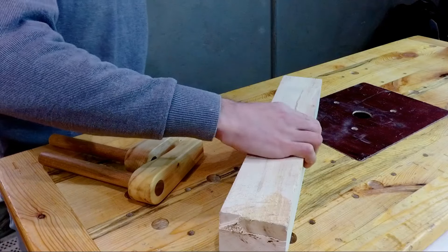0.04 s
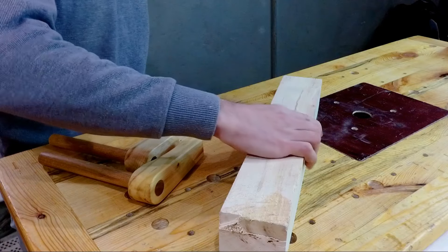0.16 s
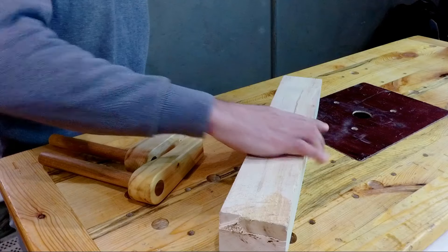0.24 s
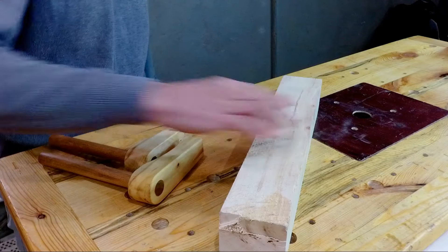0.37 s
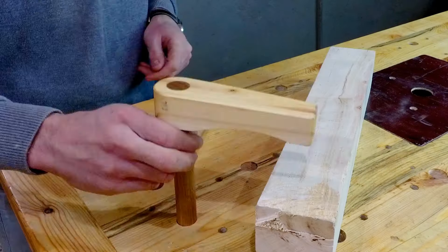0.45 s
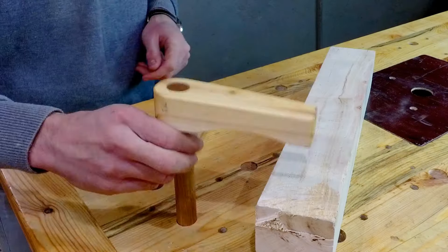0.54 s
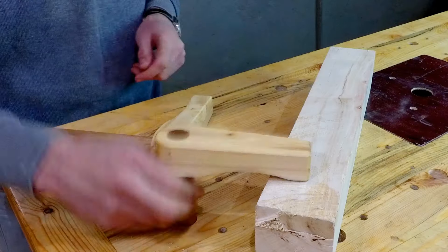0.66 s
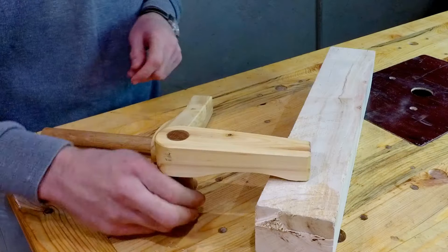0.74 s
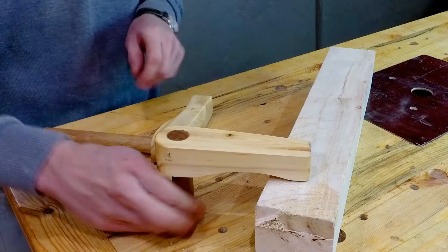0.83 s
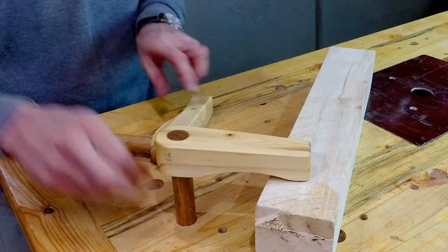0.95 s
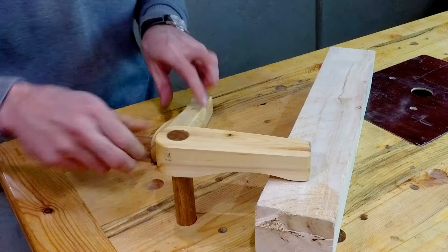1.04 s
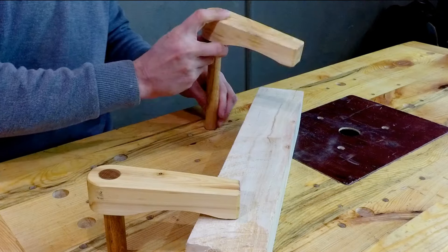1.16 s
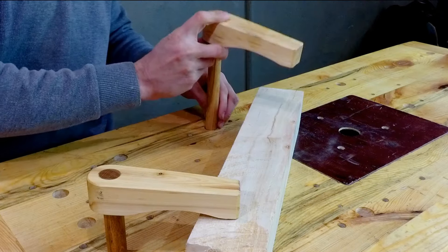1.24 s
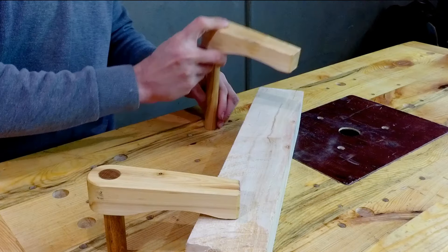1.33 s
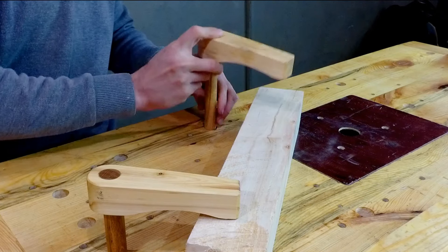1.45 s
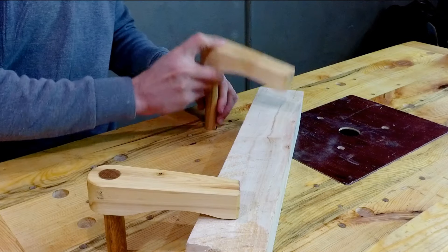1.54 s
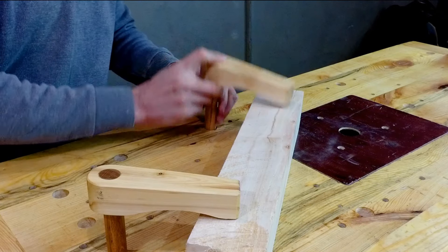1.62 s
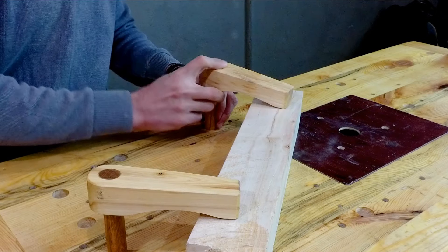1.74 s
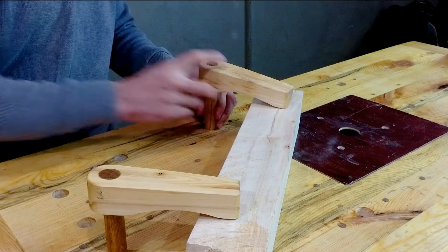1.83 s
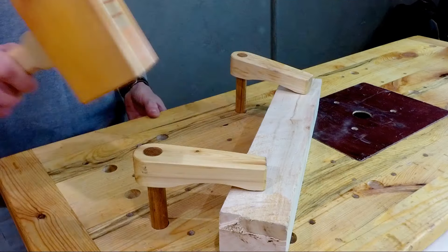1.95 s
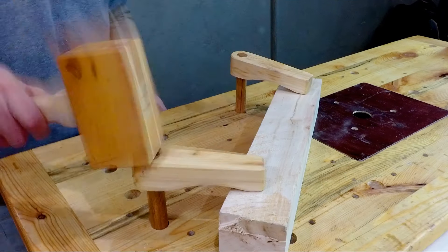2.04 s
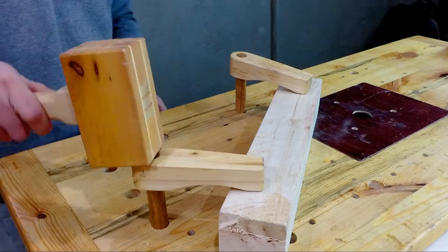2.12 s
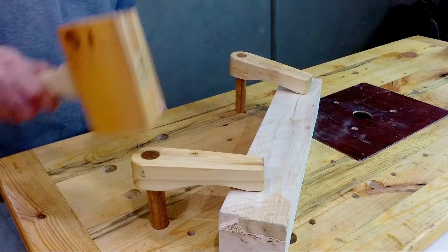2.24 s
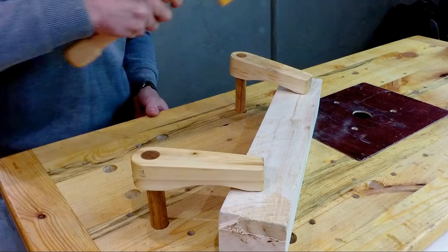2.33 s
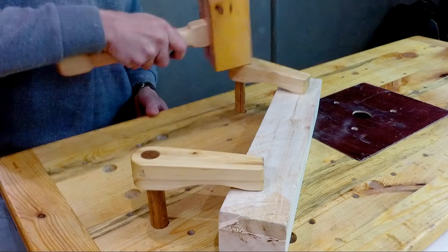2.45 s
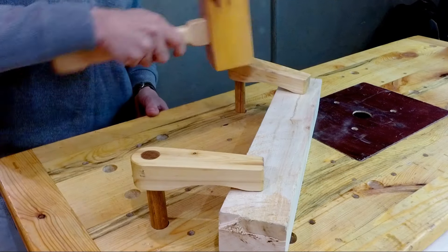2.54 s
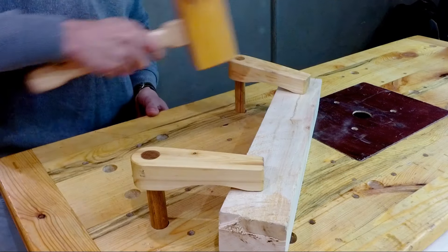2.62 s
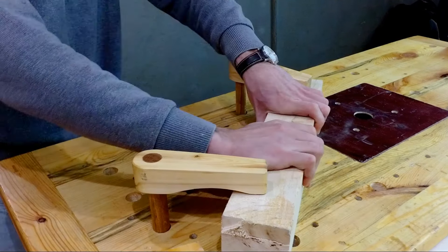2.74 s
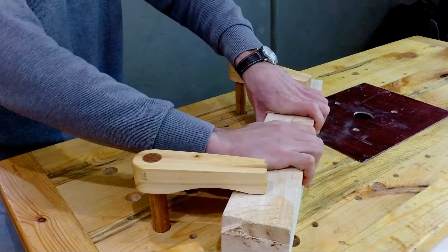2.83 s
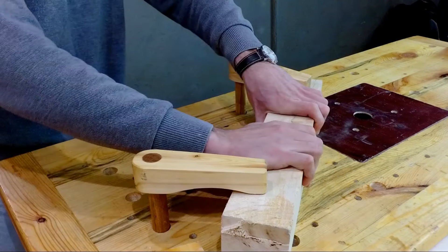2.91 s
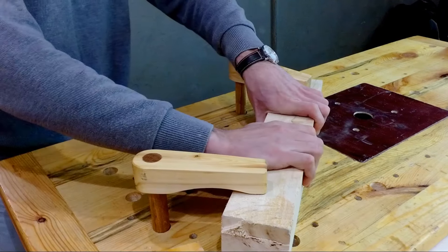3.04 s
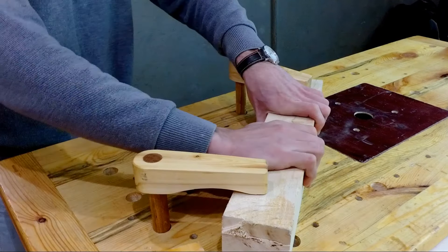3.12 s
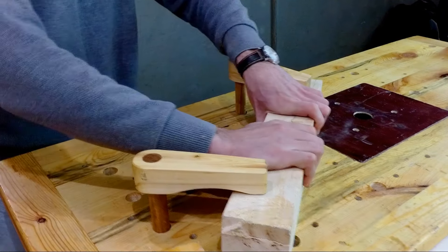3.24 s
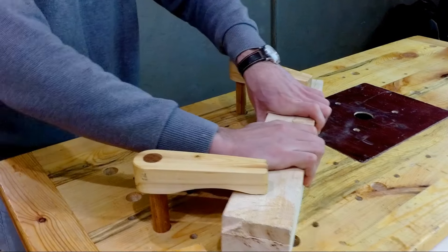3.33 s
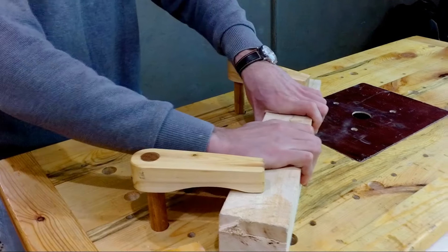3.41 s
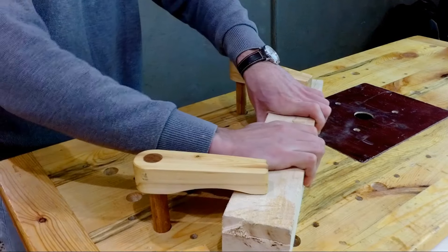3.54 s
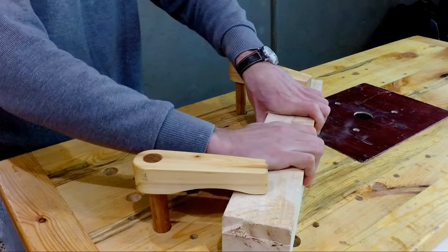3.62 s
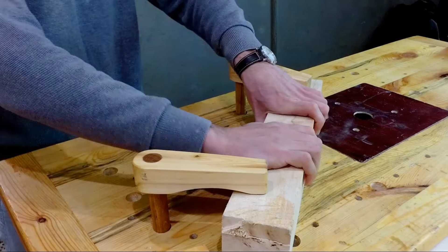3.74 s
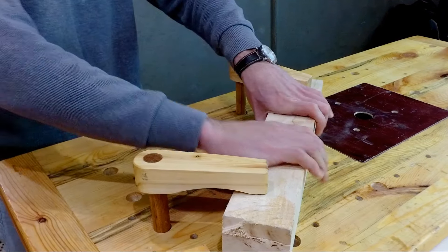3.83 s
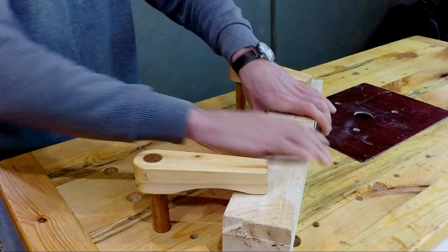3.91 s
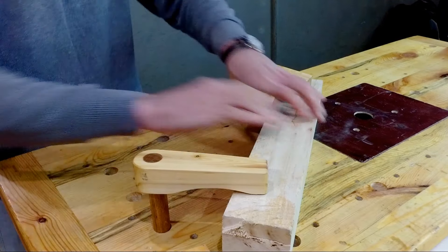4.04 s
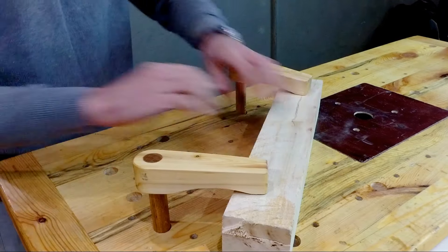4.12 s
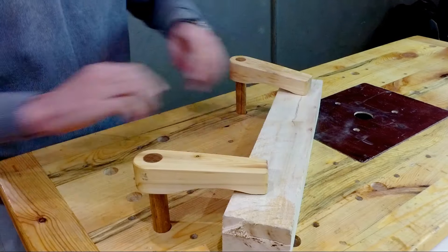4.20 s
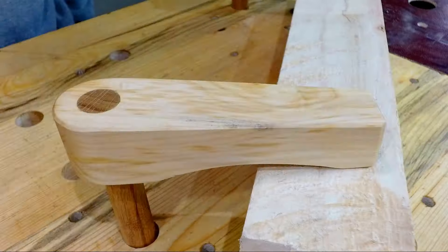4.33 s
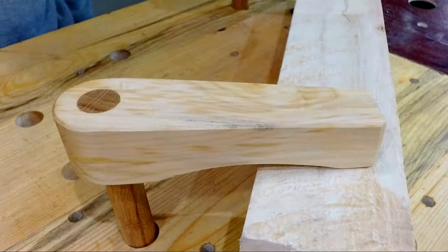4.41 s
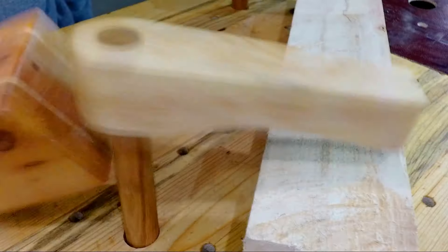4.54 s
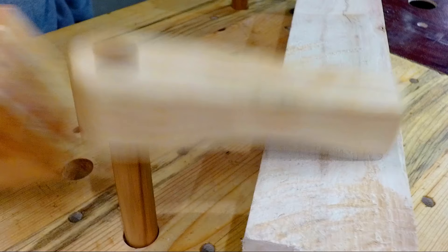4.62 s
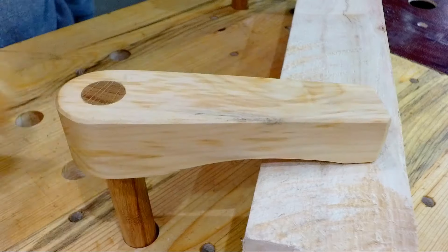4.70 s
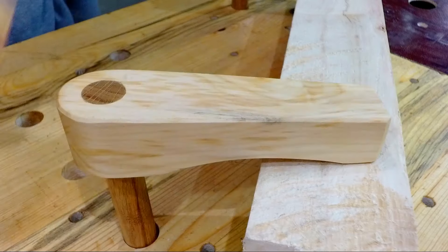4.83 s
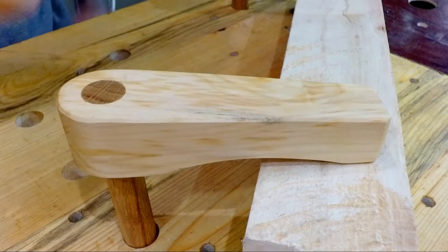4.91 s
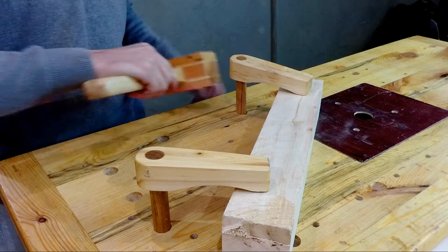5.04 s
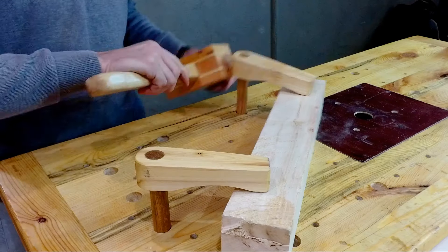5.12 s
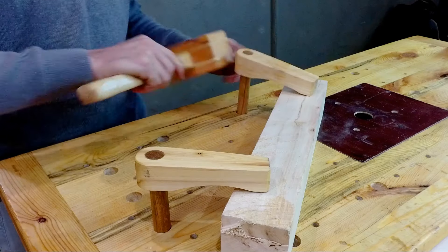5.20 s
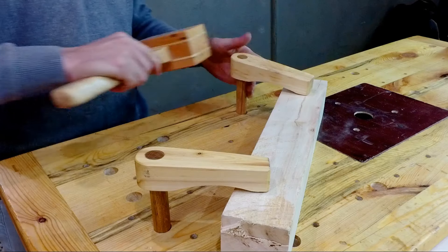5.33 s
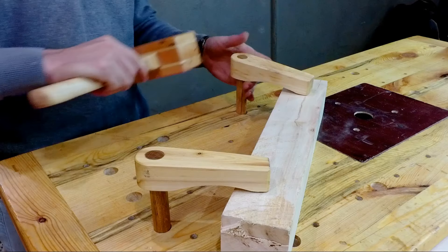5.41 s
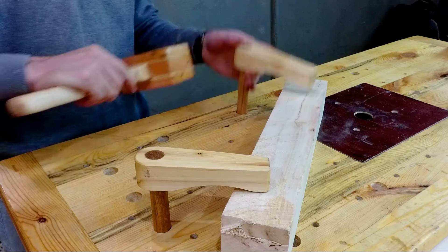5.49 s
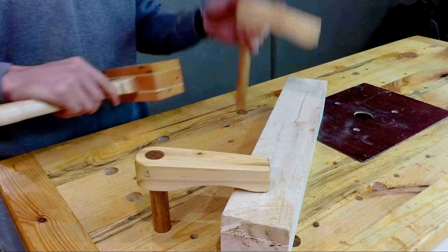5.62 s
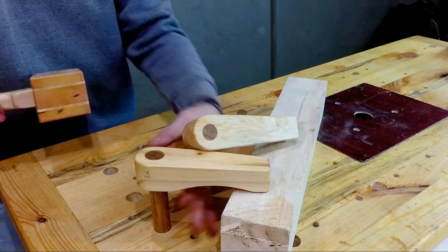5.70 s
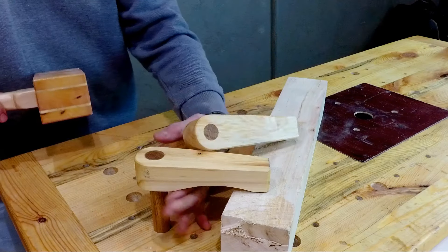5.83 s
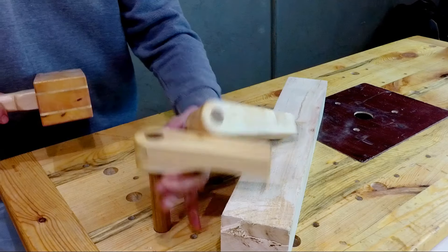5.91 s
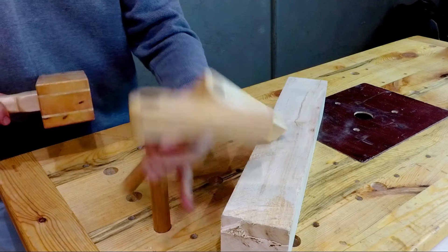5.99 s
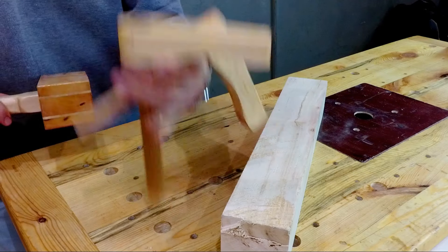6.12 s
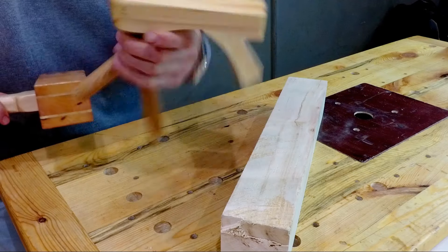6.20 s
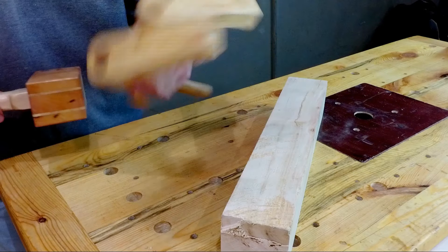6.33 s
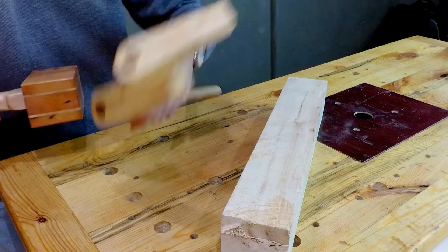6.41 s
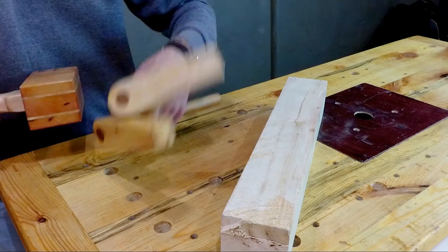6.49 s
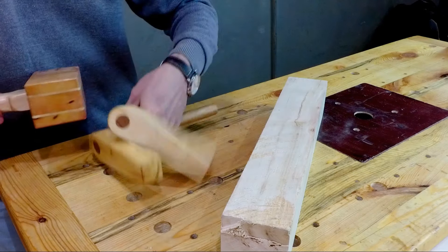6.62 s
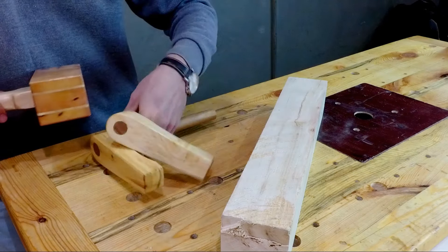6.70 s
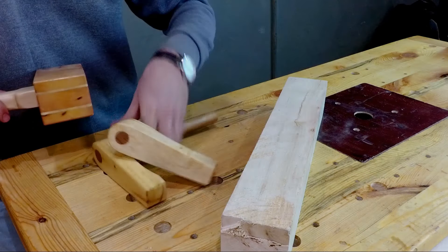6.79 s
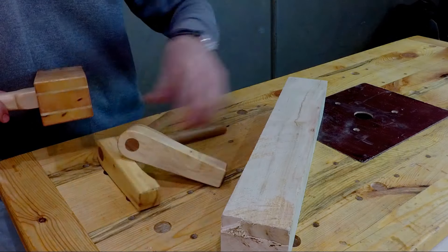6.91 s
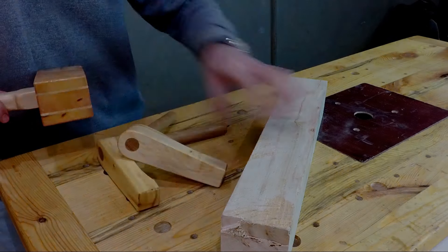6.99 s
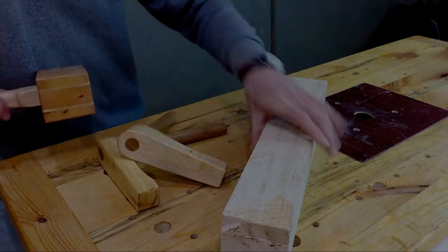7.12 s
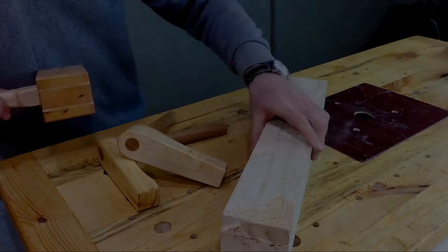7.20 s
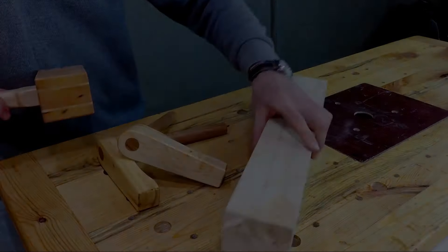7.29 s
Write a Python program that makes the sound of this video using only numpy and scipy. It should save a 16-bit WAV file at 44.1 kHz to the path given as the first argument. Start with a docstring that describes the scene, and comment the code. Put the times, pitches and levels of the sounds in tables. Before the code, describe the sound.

Close workshop woodwork: dull wooden knocks, two loud mallet cracks, low creaking and bumps, sharp loosening hits, then a quick clatter of loose wooden pieces.

```python
"""Holdfast clamps at a workbench

Close stereo microphone in a small workshop. Two wooden clamps drop into the bench, a mallet drives them
home on a beam and knocks them loose; they slide out, clack together and are laid down.
Blows ring the bench and the struck piece; shoving and sliding are random stick-slips coloured by the wood.
A faint narrow hiss, dense random pulses around 1.8 kHz, is heard during the shoving.
The room answers with decaying noise, and the hardest blows overload the microphone."""
import sys
import numpy as np
from scipy import signal
from scipy.fft import rfft, irfft, next_fast_len
from scipy.io import wavfile

SR = 44100
rng = np.random.default_rng(int(sys.argv[2]) if len(sys.argv) > 2 else 0)


def wav_out(sig):
    """Save sig, one row per channel (or a flat mono array), as 16-bit PCM at SR to the path in sys.argv[1]."""
    wavfile.write(sys.argv[1], SR, np.round(np.clip(np.atleast_2d(sig).T, -1, 1) * 32767).astype(np.int16))


N = 324135

# Quiet air and microphone hiss: pitch_hz, level_db (relative)
FLOOR_COLOUR = [(25, -16), (65, -15), (110, -8), (200, -1), (330, 0), (550, -4), (1000, -13), (3000, -15),
                (14000, -16)]
FLOOR_DB = -70  # rms
# Decay of the workshop: pitch_hz, t60_s
ROOM_DECAY = [(80, 0.58), (170, .66), (300, 0.29), (700, 0.36), (1500, 0.29), (3500, 0.3), (6000, 0.21),
              (12000, 0.22)]
# Colour of the workshop's answer: pitch_hz, level_db
ROOM_COLOUR = [(60, -4.5), (200, 0.5), (500, -4), (1500, -1), (4000, -4), (9000, -9), (15000, -12)]
# Difference between the microphone's two ports in diffuse sound: pitch_hz, side_db
SIDE_COLOUR = [(60, -8), (150, -18), (250, -20.5), (700, -17.5), (1400, -10.5), (3000, -4), (6000, 0),
               (12000, 1)]
# Faint narrow hiss around 1.8 kHz during the shoving: pitch_hz, level_db (relative)
HISS_COLOUR = [(1000, -36), (1500, -9), (1750, -4), (1900, -7), (2200, -18.5), (3200, -31)]
# Span of the narrow hiss: start_s, end_s
HISS_SPAN = (2.85, 4.05)
HISS_PULSES_PER_S = 3000
# Effort of the hands on the clamped beam: start_s, effort_db
SHOVE = [(2.78, -55), (2.96, -56), (3.178, -68), (3.262, -57.5), (3.58, -49.5), (3.75, -56), (3.928, -59),
         (4.1, -68), (4.3, -73)]
# Rumble of the whole bench: pitch_hz, level_db (relative)
RUMBLE_COLOUR = [(30, -27.5), (80, -28), (115, -3.5), (165, 1), (290, 3), (390, -4.5), (520, -17.5),
                 (900, -29), (2000, -59)]
# Creak of the bench top: pitch_hz, level_db (relative)
CREAK_COLOUR = [(200, 2.5), (450, 4), (600, 4), (900, -5.5), (1400, -15), (2500, -21), (6000, -26)]
CREAK_DB, CREAK_GROWS = -2.5, 1.9  # creak over rumble at full effort; its dB per dB of effort
CREAK_SLIPS_PER_S, SCRAPE_SLIPS_PER_S = 450, 1500
# Wood and sleeves slide over wood; a shaft binding in its hole judders the bench:
# start_s, length_s, scrape_db, judder_db
STROKES = [ (0.409, 0.043, -63.5, -68.5), (0.56, 0.16, -62.5, -77), (1.325, 0.14, -69.5, -73.5),
           (1.566, 0.14, -67, -86), (3.21, 0.079, -62.5, -64.5), (3.372, 0.026, -62.5, -64),
           (3.486, 0.026, -57, -71), (3.566, 0.027, -75, -75), (5.567, 0.036, -62.5, -67.5),
           (5.618, 0.12, -78, -58), (5.738, 0.045, -67.5, -76), (5.894, .1, -59.5, -54),
           (5.993, 0.11, -74.5, -74), (6.556, 0.13, -73, -88)]
# Dry scrape: pitch_hz, level_db (relative)
SCRAPE_COLOUR = [(300, -7.5), (900, -2.5), (1900, -4), (3000, -6), (5500, -5), (8000, -11), (15000, -6.5)]
STROKE_ATTACK_S, STROKE_RELEASE_S = 0.038, 0.29  # rise time; time to fall 60 dB
JUDDER_RUMBLE_DB = -3.5  # rumble relative to the judder's creak
# Joints and feet of the bench give way: start_s, peak_db
JOLTS = [(3.423, -45), (3.502, -42.5), (3.553, -41.5), (3.694, -43), (3.776, -43), (3.884, -42),
         (4.024, -45.5), (5.345, -43), (5.927, -56.5)]
# Bright ticks of jarred shafts: start_s, level_db, top_db (gain from 13 kHz up)
CHATTER = [(2.68, -26.5, -2.5), (4.56, -15.5, -2.5), (5.152, -12.5, -9.5), (5.16, -32, -3.5),
           (5.171, -25, -7), (6.111, -32, -12), (6.69, -42.5, 2), (6.8288, -23.5, -44), (6.908, -28.5, -17),
           (6.917, -25, -23)]
# Colour of the ticks below their top: pitch_hz, level_db
CHATTER_COLOUR = [(1500, -30), (4000, -9.5), (5600, -3), (7500, -12)]
# Loose clamps meet in the hand: start_s, level_db, lowest_hz, highest_hz, room_db
CLACKS = [(6.067, -36.5, 301, 646, 14), (6.111, -22, 770, 5000, -4), (6.1941, -36.5, 347, 5250, -0.5),
          (6.45, -47, 300, 1326, 3)]
# Modes of a loose clamp: pitch_hz, level_db, t60_s
CLAMP_MODES = [(565, -14, .25), (1184, -12, .08), (1373, -15, .08), (1610, -12, .06), (1750, -9, .06),
               (1906, -9, .05), (2363, -2, .06), (2530, -1, .08), (3634, -14, .05), (3941, -7, .035),
               (4700, -11, .035), (5300, -7, .025), (5825, -10, .025)]
CLACK_ATTACK_S = 0.002
# Arms jarred half free ring at a pitch set by the wedged shaft: start_s, pitch_hz, level_db, t60_s
ARM_RINGS = [(2.678, 2440, -33.5, 0.047), (4.5526, 2333, -18.5, 0.052), (4.6764, 2100, -27.5, 0.052),
             (4.6784, 4040, -25.5, 0.02), (4.6764, 5160, -35, 0.017)]
# Knocks on the bench: start_s, level_db, contact_hz (higher is harder), weight_db (bass lift),
# note_hz (of the struck piece), note_lift_db, room_db
BLOWS = [ (0.02, -24, 1086, -7, 384, 4.5, -3), (0.6933, -32.5, 960, 7, 197, 6.5, -1),
         (1.067, -55, 320, 20, 282, 10.5, -3), (1.205, -52, 730, -12, 640, 10, 1),
         (1.435, -60, 800, 34, 306, 10, 2), (1.681, -35.5, 634, -17, 277, 8.5, -7),
         (2.072, -14, 3750, 20.5, 1385, 5.5, -1.5), (2.466, -12, 4070, 19.5, 1366, 6.5, -0.5),
         (2.678, -29.5, 2880, 21.5, 191, 10, -0.5), (2.686, -38, 4020, 20, 5770, 10, 11.5),
         (3.234, -57.5, 3220, -4, 2530, 3, 6), (4.5514, -16, 2740, 3, 266.3, 10.5, -4.5),
         (4.577, -22.5, 3480, 7.5, 510, 14, 0.5), (4.6763, -27, 1720, 8, 540, 11, -6),
         (5.1519, -22, 2490, -1.5, 500, 10, -3.5), (5.916, -48.5, 800, -3, 542, 11, 15),
         (6.6893, -24.5, 845, -16.5, 867, 12.5, -1.5), (6.79, -37, 895, 2, 647, 10, -4),
         (6.827, -22, 1540, -19.5, 790, 13, -2), (6.836, -26, 1740, -10, 3800, 11.5, 0),
         (6.868, -29, 1250, -19, 644, 13, 5.5), (6.9082, -34.5, 1600, 2, 2020, 22.5, -1),
         (6.918, -36.5, 2140, 7, 680, 9, -10), (6.941, -34.5, 1520, -7, 585, 10, -12),
         (6.966, -40.5, 1660, 14, 855, 13, -17), (6.992, -47.5, 1200, 16, 480, 4, -21),
         (7.235, -64, 544, 10, 289, 2, -0.5), (7.301, -58.5, 350, 8, 288, 15.5, -6)]
# Resonances of the bench top with the beam on it: pitch_hz, width_hz, lift_db
BENCH_RESONANCES = [(168, 35, 5), (252, 20, 5), (278, 18, 7), (375, 22, 6), (493, 22, 7), (835, 30, 6),
                    (1073, 45, 4), (1296, 55, 4), (1385, 30, 4), (1509, 30, 4), (1629, 60, 2),
                    (1843, 45, 3), (2100, 40, 3), (2368, 35, 4), (2803, 45, 3), (3012, 35, 3),
                    (3462, 35, 3), (4350, 40, 4)]
# The bench under an ideally hard tap: pitch_hz, level_db
TAP_RESPONSE = [(30, -33), (80, -26.5), (170, -9.5), (330, -1.5), (800, -3.5), (2000, -3), (5000, -0.5),
                (13000, 3.5)]
# Decay of the wood's crowded overtones: pitch_hz, t60_s
WOOD_DECAY = [(60, 0.24), (300, 0.14), (800, 0.15), (2000, 0.064), (5000, 0.028), (12000, 0.051)]
CONTACT_ORDER = 3.15  # steepness of the fall above a contact's corner
WEIGHT_HZ = 162.9  # a blow's weight acts mainly below this
BLOW_S = 0.041  # time over which a blow's level is reckoned
HUSH_S = 2.304  # the ring of every blow begun before this drops here
GLANCE_DB, GLANCE_HZ, GLANCE_T60_S = -7, 7040, 0.018  # bench-top reflections: level, low cut, decay
TOP_HZ = 15500  # band limit of the microphone chain

LENGTH = 32768  # samples in one short sound
T = np.arange(LENGTH) / SR
HZ = np.fft.rfftfreq(LENGTH, 1 / SR)


def amp(db):
    """Decibels to gain."""
    return 10 ** (np.asarray(db) / 20)


def unit(x):
    """Scale to rms 1."""
    return x / np.sqrt(np.mean(x ** 2) + 1e-20)


def along(points, hz):
    """Interpolate (Hz, value) points on a log frequency axis."""
    f, value = np.transpose(points)
    return np.interp(np.log(hz + 1), np.log(f + 1), value)


def fade(t60, t=T):
    """Exponential decay, 60 dB down at t60."""
    return np.exp(-np.log(1000) * t / np.maximum(t60, 1e-4))


def envelope(start, length, attack, release):
    """Rise from the start, and die away once the length is over."""
    t = np.arange(N) / SR - start
    rise = np.clip(t / max(attack, 1e-3), 0, 1)
    return rise * fade(release, np.maximum(t - length, 0))


def add(track, s, sound):
    """Mix a sound in at time s."""
    start = round(s * SR)
    part = sound[:, :N - start]
    track[:, start:start + part.shape[1]] += part


def filtered(x, response):
    """Multiply the spectrum of x by a response of frequency."""
    size = x.shape[-1]
    padded = next_fast_len(size + 8192)
    gain = response(np.fft.rfftfreq(padded, 1 / SR))
    return irfft(rfft(x, padded) * gain, padded)[..., :size]


def coloured(x, points):
    """Causal minimum-phase filter through (Hz, dB) points, so that attacks stay sharp."""
    cepstrum = irfft(np.log(amp(along(points, HZ))))
    # Fold the cepstrum onto positive time.
    cepstrum[1:LENGTH // 2] *= 2
    cepstrum[LENGTH // 2 + 1:] = 0
    impulse = irfft(np.exp(rfft(cepstrum)))
    return signal.fftconvolve(x, impulse[None], axes=1)[:, :x.shape[1]]


def low_cut(x, corner_hz):
    """Second-order high-pass; small pieces of wood radiate little bass."""
    return signal.sosfilt(signal.butter(2, corner_hz, "highpass", fs=SR, output="sos"), x)


def dying_noise(t60s):
    """Noise of unit energy, even over frequency, each frequency dying at its own speed."""
    hz, t, bins = signal.stft(rng.standard_normal(LENGTH), SR, nperseg=128)
    t60 = np.maximum(along(t60s, hz), 0.003)[:, None]
    decaying = bins * fade(t60, t) / np.sqrt(t60)
    x = signal.istft(decaying, SR, nperseg=128)[1][:LENGTH]
    return x / np.linalg.norm(x)


def diffuse(mid, side):
    """Sound from all around differs between the ports mostly in the treble."""
    side = filtered(side, lambda hz: amp(along(SIDE_COLOUR, hz)))
    return np.array([mid + side, mid - side])


def glance(size=1024):
    """First treble reflections off the bench top, different at each port."""
    burst = rng.standard_normal((2, size)) * fade(GLANCE_T60_S, T[:size])
    scatter = unit(burst) / np.sqrt(size)
    return np.pad(amp(GLANCE_DB) * low_cut(scatter, GLANCE_HZ), [(0, 0), (0, LENGTH - size)])


def in_room(x, wet_db, lead_samples=0.29, build_up=0.023):
    """Direct sound, a little earlier on the left, its first reflections and a fresh workshop tail."""
    tail = diffuse(dying_noise(ROOM_DECAY), dying_noise(ROOM_DECAY)) * (1 - fade(build_up))
    answer = glance() + amp(wet_db) * coloured(tail, ROOM_COLOUR)
    lead = lead_samples * np.array([[1], [-1]])  # half the lead on each port
    direct = filtered(x, lambda hz: np.exp(1j * np.pi * hz / SR * lead))
    return direct + signal.fftconvolve(x[None], answer, axes=1)[:, :len(x)]


def floor():
    """Quiet room air and microphone hiss: coloured diffuse noise."""
    noise = diffuse(*rng.standard_normal((2, N)))
    return amp(FLOOR_DB) * unit(coloured(noise, FLOOR_COLOUR))


def random_pulses(rate, spread_db):
    """Tiny pulses at random moments and of random sizes."""
    moments = rng.random(N) < rate / SR
    return moments * rng.standard_normal(N) * amp(spread_db * rng.standard_normal(N))


def pulse_run(colour, rate, spread_db, wet_db):
    """A steady run of random pulses, set in the room and coloured, at rms 1."""
    return unit(coloured(in_room(random_pulses(rate, spread_db), wet_db), colour))


def narrow_hiss(level_db=-72):
    """Faint narrow hiss around 1.8 kHz: dense random pulses through a narrow colour."""
    start, end = HISS_SPAN
    hiss = pulse_run(HISS_COLOUR, rate=HISS_PULSES_PER_S, spread_db=4.5, wet_db=3)
    return amp(level_db) * hiss * envelope(start, end - start, attack=0.032, release=0.31)


def rumble():
    """Stick and slip: small slips in the joints shake the whole bench."""
    return pulse_run(RUMBLE_COLOUR, rate=210, spread_db=2.5, wet_db=6.5)


def creak(bass_hz=230):
    """The same kind of slips ring the bench top."""
    ringing_top = pulse_run(CREAK_COLOUR, rate=CREAK_SLIPS_PER_S, spread_db=3.5, wet_db=5.5)
    return unit(low_cut(ringing_top, bass_hz))


def shoving(shake, grind):
    """The bench rumbles with the effort and creaks more as it grows."""
    s, db = np.transpose(SHOVE)
    effort_db = np.interp(np.arange(N) / SR, s, db, left=-120, right=-120)
    creak_db = db.max() + CREAK_DB + CREAK_GROWS * (effort_db - db.max())
    return amp(effort_db) * shake + amp(creak_db) * grind


def strokes(shake, grind):
    """Dry grain catches in a dense run of tiny slips; the same stroke drives the judder."""
    scrape = pulse_run(SCRAPE_COLOUR, rate=SCRAPE_SLIPS_PER_S, spread_db=3.0, wet_db=9)
    judder = grind + amp(JUDDER_RUMBLE_DB) * shake
    out = np.zeros((2, N))
    for s, length, scrape_db, judder_db in STROKES:
        sliding = amp(scrape_db) * scrape + amp(judder_db) * judder
        out += envelope(s, length, STROKE_ATTACK_S, STROKE_RELEASE_S) * sliding
    return out


def jolts():
    """A joint or foot gives way with one dull bump."""
    out = np.zeros((2, N))
    for s, peak_db in JOLTS:
        jolt = coloured(in_room(dying_noise(WOOD_DECAY), wet_db=-0.5), RUMBLE_COLOUR)
        add(out, s, amp(peak_db) * jolt / np.abs(jolt).max())
    return out


def chatter(t60=0.023):
    """A jarred shaft ticks against the wood around it: a short bright noise burst."""
    out = np.zeros((2, N))
    for s, db, top_db in CHATTER:
        tick = in_room(rng.standard_normal(LENGTH) * fade(t60), wet_db=4.5)
        add(out, s, amp(db) * coloured(tick, [*CHATTER_COLOUR, (13000, top_db)]))
    return out


def ringing(modes, scatter_db, attack):
    """Damped modes, struck at slightly new strengths each time."""
    hz, db, t60 = np.transpose(modes)[:, :, None]
    sign = rng.choice([-1, 1], hz.shape)
    size = amp(db + scatter_db * rng.standard_normal(hz.shape)) * sign
    tones = size * fade(t60) * np.sin(2 * np.pi * hz * T)
    return tones.sum(0) * (1 - fade(attack))


def strike(push_db=-7):
    """The single push of a contact, with the crowded overtones of the wood."""
    return amp(push_db) * (T == 0) + dying_noise(WOOD_DECAY)


def clacks(crack_db=23):
    """Free clamps ring high and clear; grip and hardness of the contact set which modes wake."""
    out = np.zeros((2, N))
    for s, db, low_hz, high_hz, room_db in CLACKS:
        modes = ringing(CLAMP_MODES, scatter_db=4.0, attack=CLACK_ATTACK_S)
        clack = modes + amp(crack_db) * strike()
        softness = signal.butter(5, high_hz, fs=SR, output="sos")
        clack = low_cut(signal.sosfilt(softness, clack), low_hz)
        add(out, s, amp(db) * in_room(clack, wet_db=room_db))
    return out


def arm_rings(wet_db=-3):
    """The jarred arm rings briefly in a few clear modes."""
    out = np.zeros((2, N))
    for s, hz, db, t60 in ARM_RINGS:
        ring = ringing([(hz, db, t60)], scatter_db=1.0, attack=0.003)
        add(out, s, in_room(ring, wet_db))
    return out


def lift(resonances):
    """Gain in dB of (Hz, width, dB) resonances standing on a flat response."""
    hz, width, db = np.transpose(resonances)[:, :, None]
    peaks = (amp(np.abs(db)) ** 2 - 1) / (1 + (2 * (HZ - hz) / width) ** 2)
    return 10 * np.log10(1 + peaks.sum(0))


def blow_shape(contact_hz, weight_db, note):
    """Spectrum in dB at unit mean power: bench resonances, dulled by softness, deepened by weight."""
    db = along(TAP_RESPONSE, HZ) + lift([*BENCH_RESONANCES, note])
    db = db + weight_db / (1 + (HZ / WEIGHT_HZ) ** 2)
    db = db - CONTACT_ORDER * 10 * np.log10(1 + (HZ / contact_hz) ** 2)
    return db - 10 * np.log10(np.mean(amp(db) ** 2))


def band_power(power, edges):
    """Centres of the bands and their summed power in dB."""
    centres = np.sqrt(edges[1:] * edges[:-1])
    return centres, 10 * np.log10(np.histogram(HZ, edges, weights=power)[0])


def evened(x, count=26):
    """Flatten the broad colour of a noisy burst and keep its fine grain."""
    edges = np.geomspace(30, 15000, count) + 3 * np.arange(count)  # Hz
    centres, flat_db = band_power(np.ones(len(HZ)), edges)
    for _ in range(2):
        own_db = band_power(np.abs(rfft(x.mean(0))) ** 2, edges)[1]
        x = coloured(x, np.transpose([centres, flat_db - own_db]))
    return x


def blows(note_width=0.14, hush_db=-19):
    """Each contact rings the bench and the struck piece, and the room answers."""
    out = np.zeros((2, N))
    for s, db, contact_hz, weight_db, note_hz, note_db, room_db in BLOWS:
        note = (note_hz, note_width * note_hz, note_db)
        shape_db = blow_shape(contact_hz, weight_db, note)
        burst = evened(in_room(strike(), wet_db=room_db))
        knock = coloured(burst, np.transpose([HZ, shape_db]))
        if s < HUSH_S:
            knock = knock * np.where(s + T < HUSH_S, 1, amp(hush_db))
        add(out, s, amp(db) * np.sqrt(BLOW_S * SR) * knock)
    return out


def scene():
    """All but the quiet of the room is slightly to the left."""
    shake, grind = rumble(), creak()
    near = narrow_hiss() + shoving(shake, grind) + strokes(shake, grind) + jolts()
    near = near + chatter() + clacks() + arm_rings() + blows()
    left_db = 0.27  # left raised and right lowered by this
    return near * amp([[left_db], [-left_db]]) + floor()


def record(dry, top=0.38, hardness=6):
    """The hardest blows flatten against the input's ceiling; a steep cut limits the band."""
    clipped = dry / (1 + np.abs(dry / top) ** hardness) ** (1 / hardness)
    return filtered(clipped, lambda hz: 1 / (1 + (hz / TOP_HZ) ** 120))


dry = scene()
out = record(dry)
wav_out(out)
```